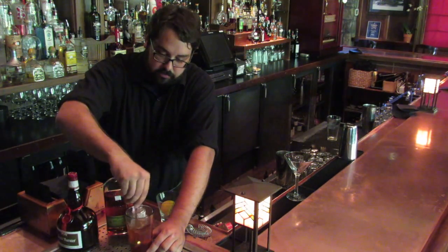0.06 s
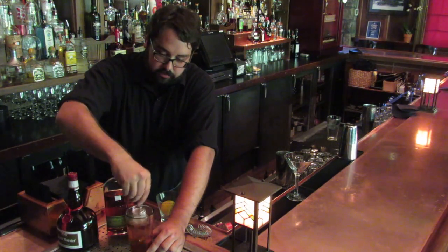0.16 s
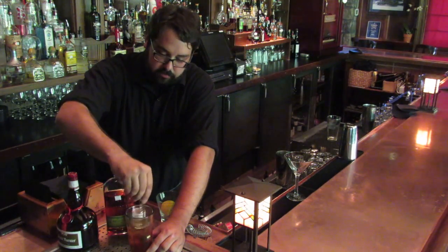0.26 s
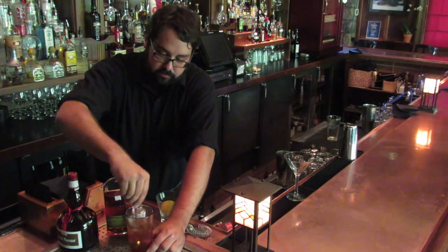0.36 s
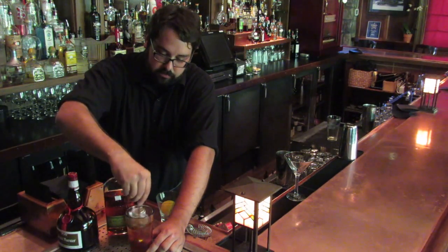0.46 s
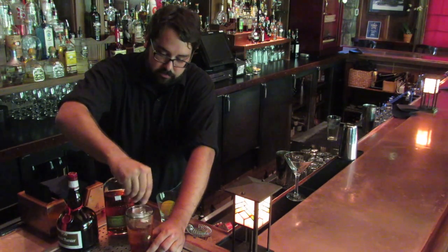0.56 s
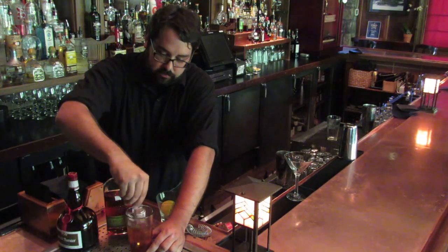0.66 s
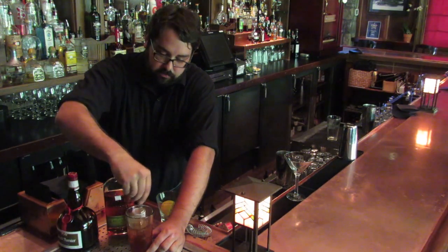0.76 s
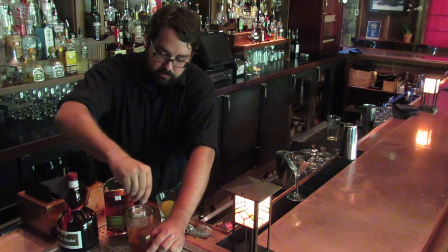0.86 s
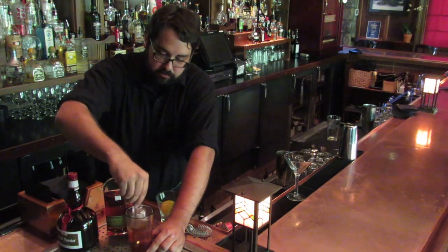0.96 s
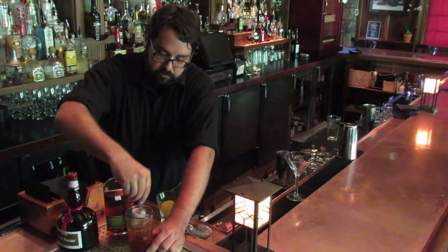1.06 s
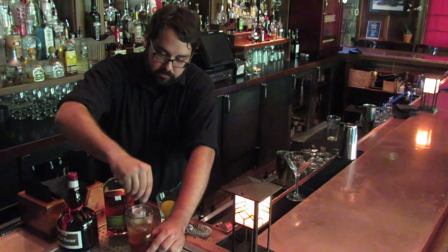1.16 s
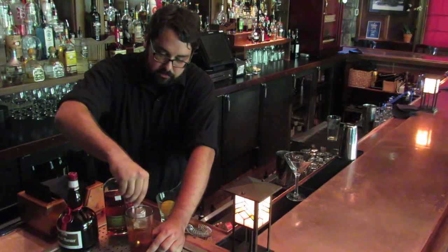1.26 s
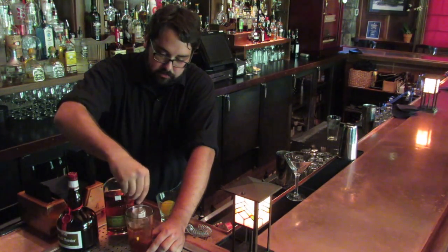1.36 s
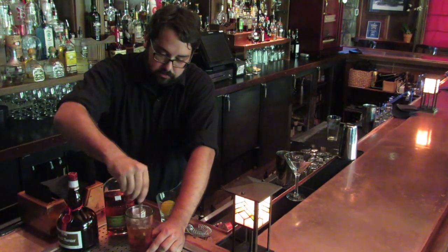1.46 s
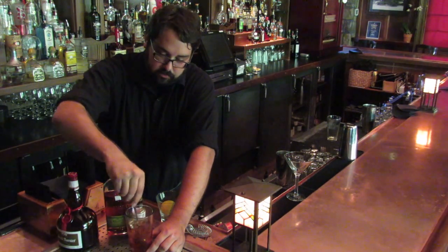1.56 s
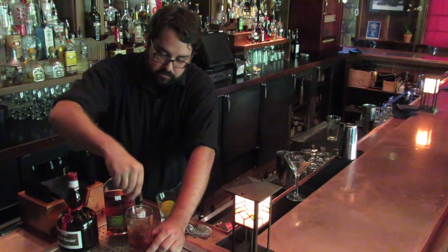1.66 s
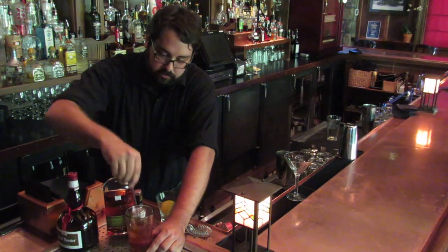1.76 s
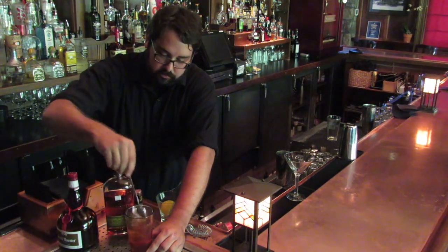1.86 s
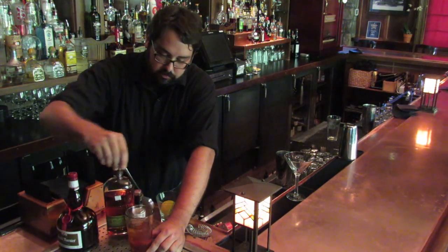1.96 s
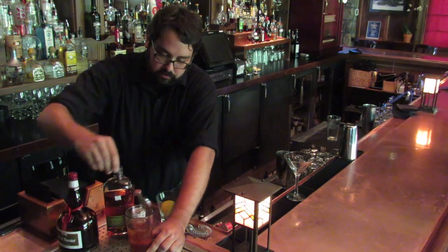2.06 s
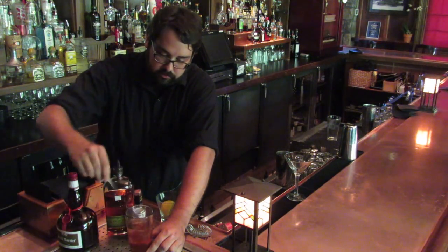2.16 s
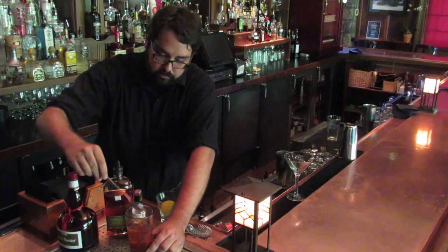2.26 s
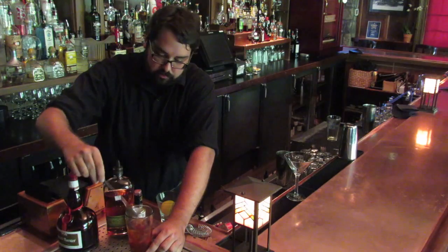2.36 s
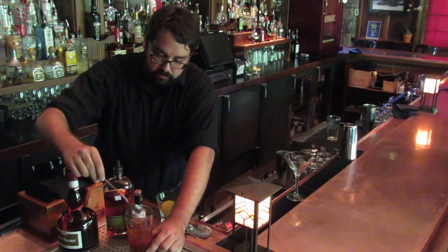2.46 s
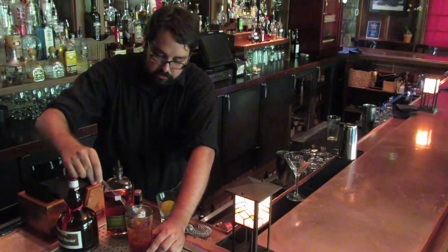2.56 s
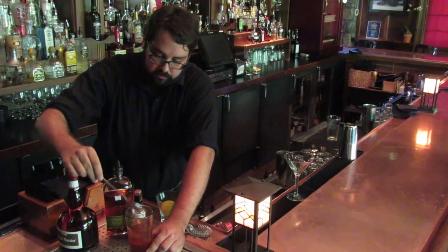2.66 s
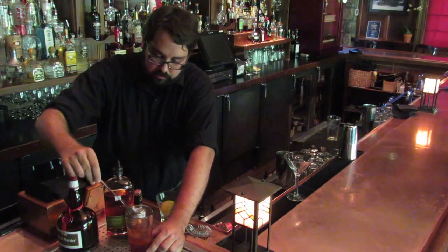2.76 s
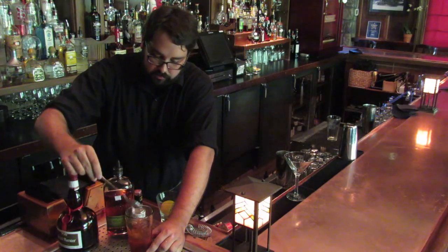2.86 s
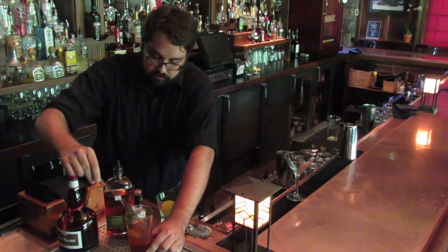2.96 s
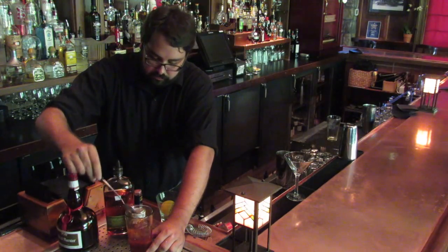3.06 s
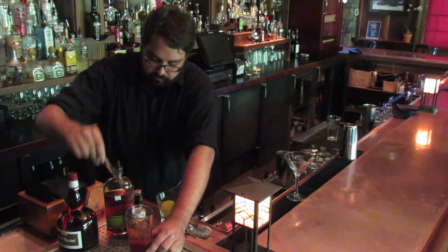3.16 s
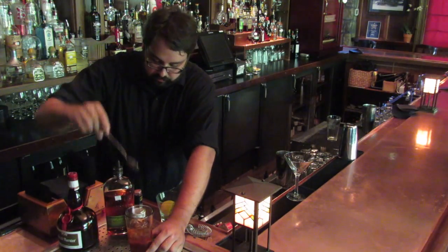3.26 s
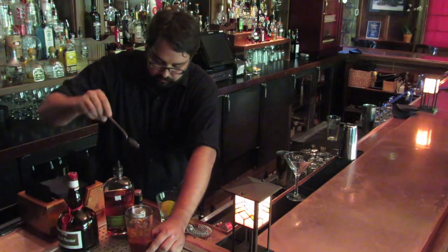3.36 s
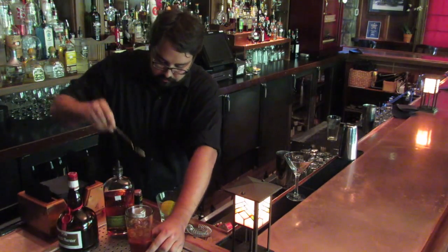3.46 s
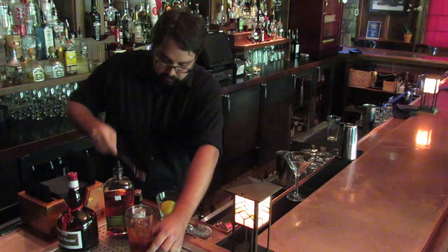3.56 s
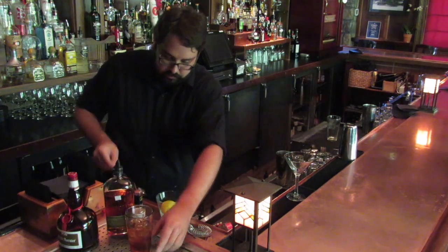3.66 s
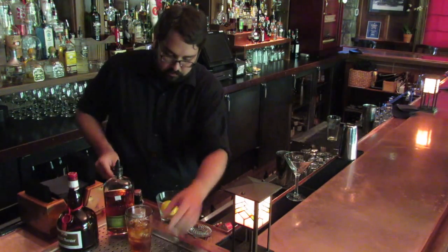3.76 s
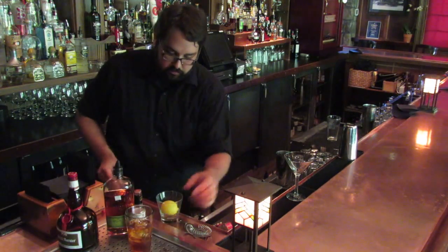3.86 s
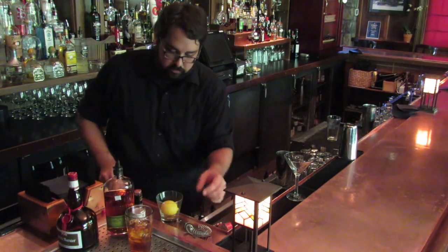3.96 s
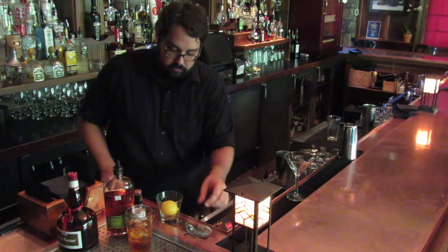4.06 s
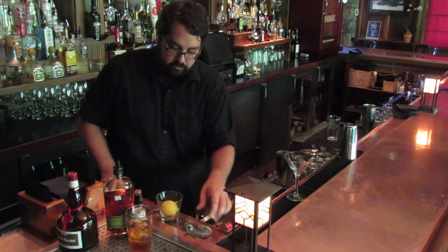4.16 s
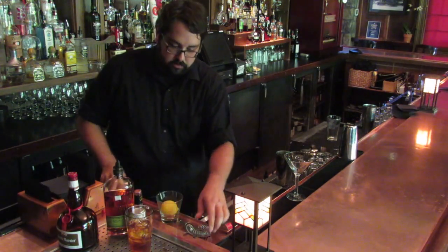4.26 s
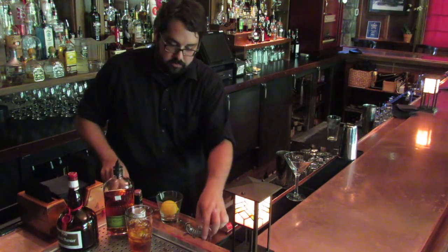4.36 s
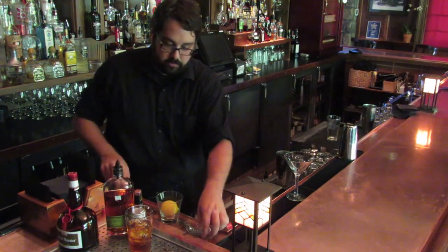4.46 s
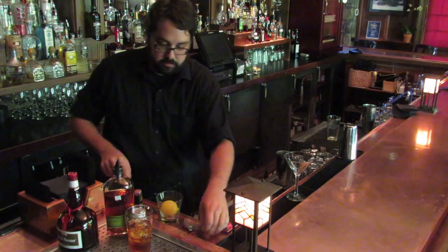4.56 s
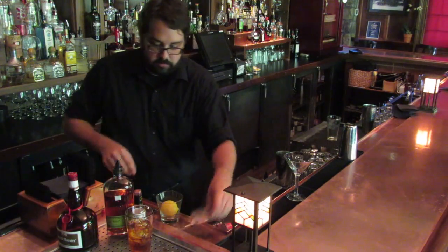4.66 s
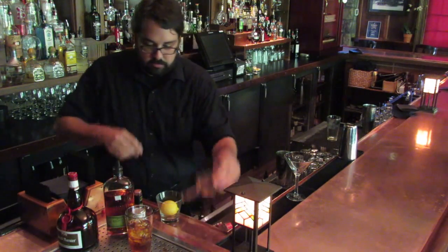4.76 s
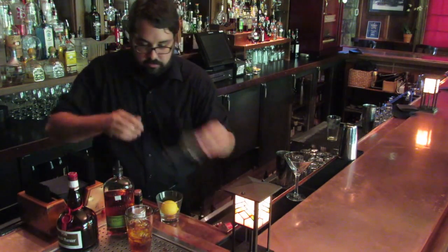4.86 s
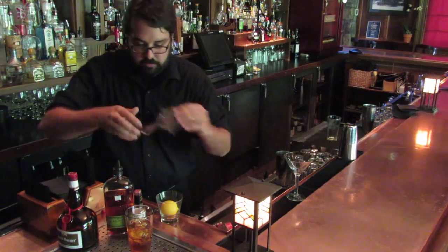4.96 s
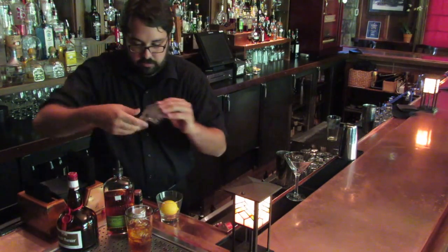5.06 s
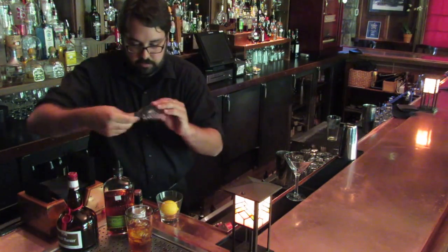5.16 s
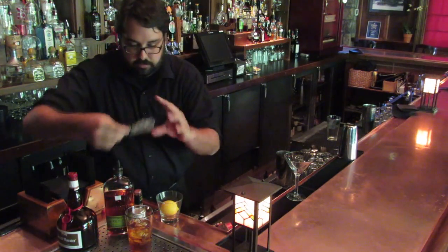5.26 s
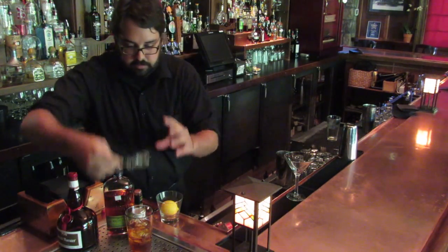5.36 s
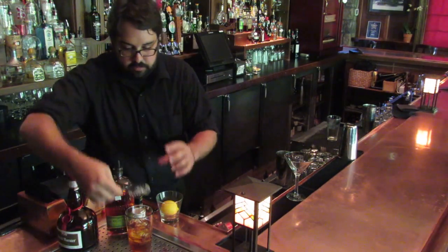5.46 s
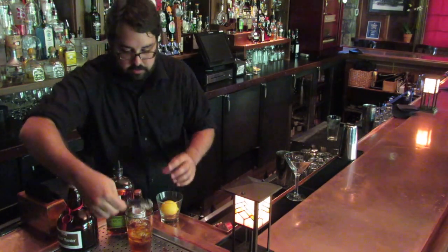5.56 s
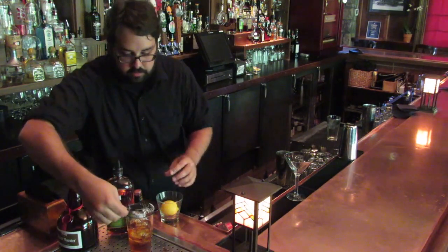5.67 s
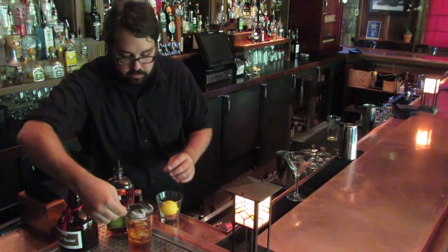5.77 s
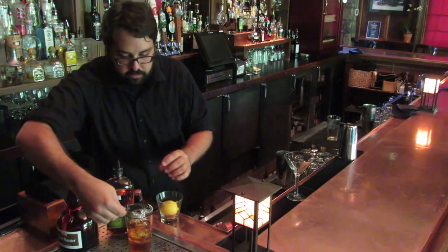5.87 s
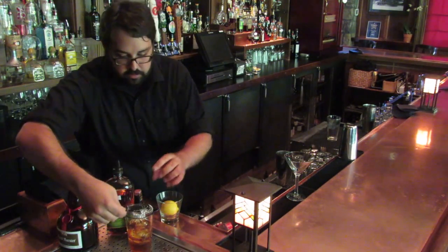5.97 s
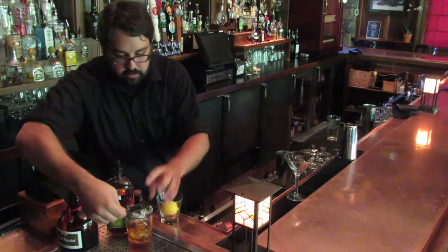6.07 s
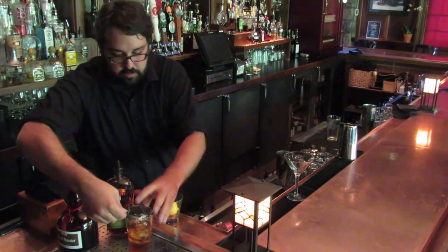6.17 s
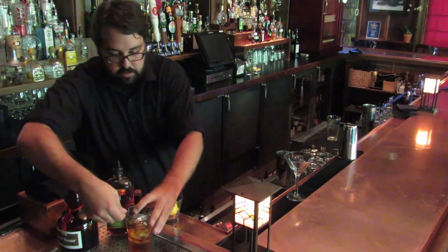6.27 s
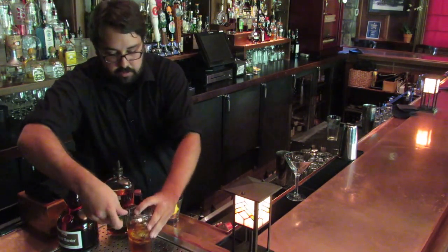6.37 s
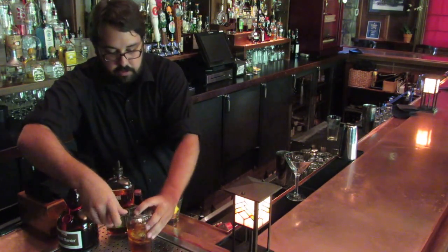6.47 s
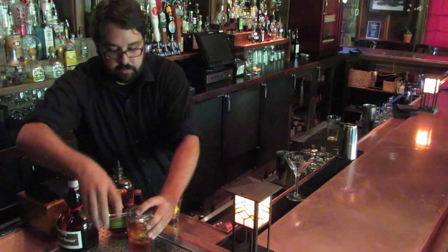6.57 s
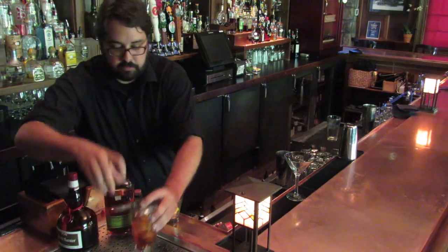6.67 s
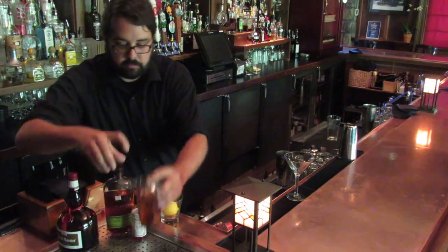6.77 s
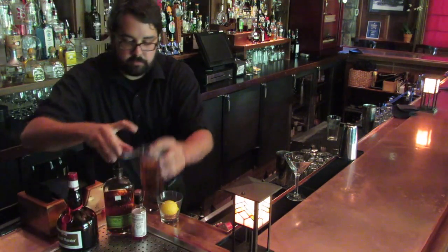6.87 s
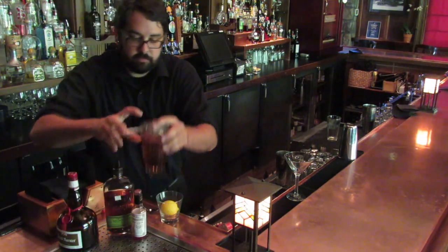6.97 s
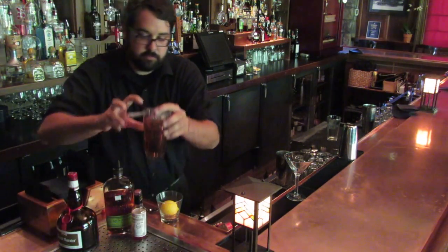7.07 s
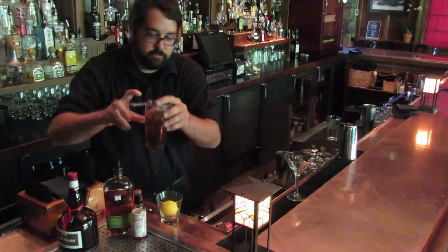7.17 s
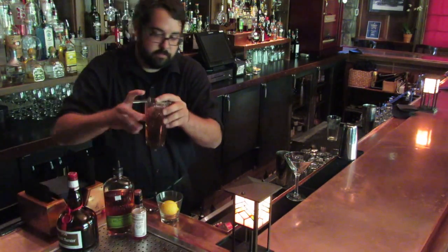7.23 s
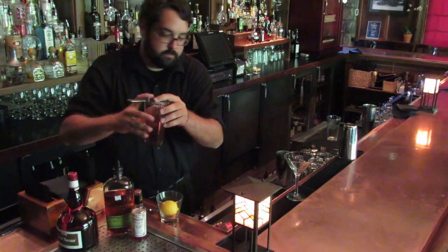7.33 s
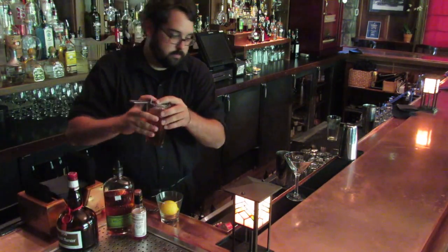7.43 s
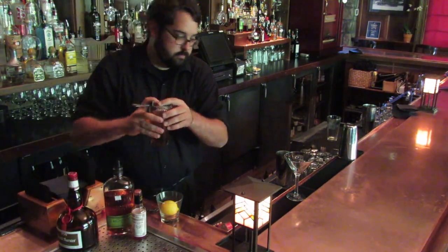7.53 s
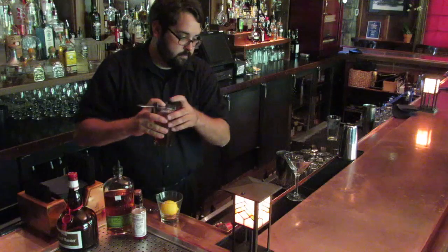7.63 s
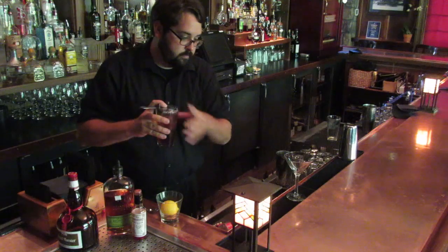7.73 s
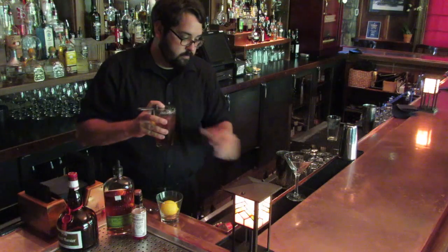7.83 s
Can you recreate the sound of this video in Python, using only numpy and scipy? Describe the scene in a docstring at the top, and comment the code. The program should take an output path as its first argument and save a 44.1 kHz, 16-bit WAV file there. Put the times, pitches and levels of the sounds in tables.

```python
"""Refrigerators hum in a bar room throughout, as steady tones over a rush of air.
At first a bar spoon stirs ice in a mixing glass: colliding cubes grind, scrape and set the damped glass singing.
The spoon then ticks five times on the rim, and the freer glass rings; the spoon is laid down with a short clank.
A spring strainer is picked up with a rattle and seated on the glass, and the glass is lifted, brushing glassware.
The camera's gain control ducks under loud sound such as the taps, then creeps back up."""
import sys
import numpy as np
from scipy import signal
from scipy.fft import rfft, irfft, next_fast_len
from scipy.io import wavfile
from scipy.ndimage import minimum_filter1d

SR = 44100
rng = np.random.default_rng(int(sys.argv[2]) if len(sys.argv) > 2 else 0)


def put_to_file(sound):
    """Save the sound as 16-bit audio at rate SR, in the file named by the first command-line argument."""
    columns = np.atleast_2d(sound).T  # one column per channel
    safe = np.clip(columns, -1, 1)
    whole_steps = np.round(safe * 32767)
    wavfile.write(sys.argv[1], SR, whole_steps.astype(np.int16))


N = 348390
TIME = np.arange(N) / SR
CUTOFF_HZ = 15900   # top of the recorded band


def from_db(db):
    """Decibels to gain."""
    return 10 ** (np.asarray(db) / 20)


def in_time(rows):
    """Draw a curve through (time, value) rows, at every sample."""
    return np.interp(TIME, *np.transpose(rows))


def at_hz(points, hz):
    """Read a spectrum on a log-frequency axis."""
    known, values = np.transpose(points)
    return np.interp(np.log(hz + 1), np.log(known), values)


def rms_one(x):
    """Scale to unit power."""
    return x / np.sqrt(np.mean(x ** 2) + 1e-20)


def smooth(x, seconds):
    """One-pole lag."""
    r = np.exp(-1 / (seconds * SR))
    return signal.lfilter([1 - r], [1, -r], x)


def colour(x, points, tilt_db=0):
    """Shape noise by a spectrum, tilted in dB per octave above 1 kHz."""
    hz = np.fft.rfftfreq(x.shape[-1], 1 / SR)
    octaves = np.log2(np.maximum(hz / 1000, 1))
    gain = from_db(at_hz(points, hz) + tilt_db * octaves)
    return irfft(rfft(x) * gain, x.shape[-1])


def drift(rate):
    """Slow random wander of spread one, with its cutoff at rate Hz."""
    knots = rng.standard_normal(int(N / SR * 100))   # 100 per second
    lowpass = signal.butter(2, min(rate, 45), fs=100, output="sos")
    slow = signal.sosfiltfilt(lowpass, knots, padtype="even")
    return np.interp(TIME, np.linspace(0, N / SR, len(slow)), rms_one(slow))


def add(track, s, sound):
    """Mix a sound in at time s."""
    part = track[int(s * SR):][:len(sound)]
    part += sound[:len(part)]


def crack(spectrum, ms, tilt_db=0, sliding_ms=20):
    """The brief, crowded ringing of a hard contact; a long one is a slide and swells in."""
    t = TIME[:SR // 8]
    swell = 1 - np.exp(-4000 * t / ms) if ms > sliding_ms else 1
    decay = np.exp(-1000 * t / max(ms, .5))
    return rms_one(colour(rng.standard_normal(len(t)), spectrum, tilt_db)) * swell * decay


def ring(hz, t60, db):
    """Modes set ringing by one blow, each dying exponentially."""
    t = TIME[:SR * 3 // 4, None]
    return np.sum(from_db(db - 60 * t / t60) * np.sin(2 * np.pi * hz * t), axis=1)


def resonate(x, hz, cycles):
    """A resonance that dies by 60 dB in so many cycles and keeps the power of what drives it."""
    r, w = from_db(-60 * hz / (cycles * SR)), 2 * np.pi * hz / SR
    zeros = np.sqrt((1 - r * r) / 2) * np.array([1, 0, -1])
    return signal.lfilter(zeros, [1, -2 * r * np.cos(w), r * r], x + 1e-18)


def grains(per_s, spread_db):
    """Random tiny collisions of uneven size."""
    when, size, sign = rng.random((3, N))
    at, out = when < per_s / SR, np.zeros(N)
    strength_db = spread_db * np.minimum(-np.log(1 - size[at]), 3.5)
    out[at] = from_db(strength_db) * np.sign(sign[at] - .5)
    return rms_one(out)


def contacts(table, modes, spectrum, scatter_db=3.5):
    """Each contact cracks and rings the body; its brightness tilts both crack and ring."""
    out, (hz, t60, mode_db) = np.zeros(N), np.transpose(modes)
    for s, crack_db, ms, tilt_db, ring_db in table:
        strengths = mode_db + tilt_db * np.log2(hz / 4000) + scatter_db * rng.standard_normal(len(hz))
        add(out, s, from_db(crack_db) * crack(spectrum, ms, tilt_db))
        add(out, s, ring(hz, t60, ring_db + strengths))
    return out


# stereo spread of diffuse sound: (f/Hz, side minus mid level/dB)
SIDE_WIDTH = [(30, 2), (100, -18), (400, -14.5), (1000, -16.5), (2500, -20), (4500, -15), (8000, -7.5),
              (12000, -2)]


def diffuse(size):
    """Stereo noise from all sides: the two capsules differ most at the bottom and top of the band."""
    mid, side = rng.standard_normal((2, size))
    width = from_db(at_hz(SIDE_WIDTH, np.fft.rfftfreq(size, 1 / SR)))
    return irfft((rfft(mid) + width * rfft(side) * [[1], [-1]]) / np.hypot(1, width), size)


# compressor and fan tones before they waver: (f/Hz, rms level/dB)
HUM_TONES = [(58.5, -48), (81, -43.5), (120, -27), (162, -36.5), (212.5, -45.5), (241, -41), (293.8, -37.5),
             (362.5, -42.5), (410.8, -41.5), (449, -46.5), (516, -50)]
# rush of air in the room: (f/Hz, level/dB per Hz)
AIR_RUSH = [(25, -67.5), (50, -82), (90, -62), (140, -56.5), (200, -50), (280, -55), (400, -59.5),
            (550, -65.5), (800, -69), (1100, -72), (2000, -81.5), (4000, -93), (10000, -98.5),
            (15500, -107)]
# how much faster the second compressor runs than the loudest tone: (t/s, f/Hz faster)
COMPRESSOR_BEAT = [(0, 1.35), (2.8, 1.45), (3.8, 0.8)]
BEAT_DB, FIRST_SWELL_S = -11.5, 0.26   # its level against the loudest tone; when the two first add up


def refrigerators(waver_db=3.5, wander_hz=0.34):
    """Tones waver over the rush of air; a second compressor beats slowly against the loudest tone."""
    hum, strongest = 0, max(db for hz, db in HUM_TONES)
    beats = np.cumsum(in_time(COMPRESSOR_BEAT)) / SR
    ahead = 2 * np.pi * (beats - np.interp(FIRST_SWELL_S, TIME, beats))
    for hz, db in HUM_TONES:
        phase = 2 * np.pi * (np.cumsum(hz + wander_hz * drift(1.66)) / SR + rng.random())
        if db == strongest:
            tone = np.sin(phase) + from_db(BEAT_DB) * np.sin(phase + ahead)
        else:
            tone = from_db(waver_db * drift(2.8)) * np.sin(phase)
        hum = hum + np.sqrt(2) * from_db(db) * tone
    air = colour(diffuse(next_fast_len(N)), AIR_RUSH)[:, :N]
    return hum + np.sqrt(SR / 2) * air


# how long the room rings: (f/Hz, 60 dB decay t/s)
ROOM_DECAY = [(300, 0.36), (2000, 0.59), (5000, 0.45), (9000, 0.45), (15000, 0.41)]


def room(x, build_s=0.001):
    """Dense echoes from counter, shelves and walls; each band of noise dies at its own pace."""
    size = SR * 3 // 4
    t, hz, noise, tail = TIME[:size], np.fft.rfftfreq(size, 1 / SR), rfft(diffuse(size)), 0
    edges = [0, 1000, 3000, 6000, 9000, 12000, SR]   # band edges, Hz
    for low, high in zip(edges, edges[1:]):
        t60 = at_hz(ROOM_DECAY, min((low + high) / 2, CUTOFF_HZ))
        band = irfft(noise * (hz >= low) * (hz < high), size)
        tail = tail + band * from_db(-60 * t / t60)
    tail = rms_one(tail * (1 - np.exp(-t / build_s))) / np.sqrt(size)
    return signal.fftconvolve(x[None], tail, axes=1)[:, :N]


def near_bottles(x, scatter_db=-6, above_hz=5000, fade_s=0.0022):
    """Bottles around the glass scatter its treble, differently to each capsule."""
    t = TIME[:SR // 30]
    paths = rms_one(rng.standard_normal((2, len(t))) * np.exp(-t / fade_s)) / np.sqrt(len(t))
    treble = signal.sosfilt(signal.butter(2, above_hz, "high", fs=SR, output="sos"), x)
    return from_db(scatter_db) * signal.fftconvolve(treble[None], paths, axes=1)[:, :N]


# ringing modes of neighbouring glassware: (f/Hz, 60 dB decay t/s, relative level/dB)
BOTTLE_MODES = [(4440, 0.029, -7), (4460, 0.025, -7), (4920, 0.018, -2), (5400, 0.011, -9.5),
                (7020, 0.06, -15), (6900, 0.019, -5.5), (10740, 0.075, -12.5), (11500, 0.07, -20),
                (14940, .04, -21)]
# light touches: (t/s, crack level/dB, crack decay/ms, brightness/dB per octave, ring level/dB)
GLASSWARE_TOUCHES = [(4.619, -25, 4, 3, -26.5), (6.944, -30, 4.6, -1.5, -31)]
# colour of a scratch on glass, for these touches and the strainer: (f/Hz, level/dB)
SCRATCH_COLOUR = [(400, 8.5), (1000, 4.5), (1900, 5), (3200, -7.5), (4600, -6), (5800, -10.5), (7000, -6),
                  (7700, 0), (8600, -9), (11700, -10), (13000, -14), (15500, -19.5)]


def glassware():
    """Neighbouring glassware is brushed as strainer and glass are lifted: a scratch and a short clink."""
    return contacts(GLASSWARE_TOUCHES, BOTTLE_MODES, SCRATCH_COLOUR)


# ringing modes of the strainer: (f/Hz, 60 dB decay t/s, relative level/dB)
STRAINER_MODES = [(2050, 0.037, -2), (2366, 0.017, 9), (2900, 0.0091, 8), (6540, 0.15, -3.5),
                  (7424, 0.24, -14), (10300, 0.29, -20), (11250, 0.36, -21), (13380, 0.2, -14)]
# picking it up: (t/s, crack level/dB, crack decay/ms, brightness/dB per octave, ring level/dB)
STRAINER_PICKUP = [(4.324, -23, 4.4, 3, -32.5), (4.331, -32, 12, -2, -31.5), (4.396, -24.5, 9.5, -4.5, -59),
                   (4.457, -34, 11, 0, -37), (4.500, -29.5, 9.4, -1.5, -57), (4.567, -23, 3.4, 0.5, -44)]
# seating it: (t/s, crack level/dB, crack decay/ms, brightness/dB per octave, ring level/dB)
STRAINER_SEATING = [(5.691, -34, 6, 4.5, -44.5), (5.724, -34, 5.9, 8, -43), (5.946, -44.5, 22, 2.5, -55),
                    (5.989, -43, 7.2, 2, -54), (6.140, -32.5, 38, 4.5, -48), (6.200, -22.5, 12.3, -3, -60),
                    (6.384, -39, 8, 0.5, -54), (6.410, -27, 10.4, 2, -53), (7.587, -45, 6.8, 0.5, -55)]
# coil rattling over the counter: (t/s, level/dB)
COIL_DRAG = [(4.32, -100), (4.34, -35), (4.47, -33.5), (4.56, -36), (4.68, -41), (4.78, -100)]
# colour of a hard contact, for strainer and spoon: (f/Hz, level/dB)
HARD_CONTACT = [(200, -24), (600, 8), (1100, -0.5), (2400, -1.5), (3600, -5.5), (6000, -8), (10000, -8),
                (15500, -21)]


def strainer(held_damping=0.29):
    """The strainer rings as it is picked up, its coil drags as a rattle, then it scratches the held glass."""
    held_glass = [(hz, t60 * held_damping, inside_db) for hz, t60, rim_db, inside_db in GLASS_MODES]
    coil = from_db(in_time(COIL_DRAG)) * colour(grains(per_s=600, spread_db=3.5), HARD_CONTACT)
    pickup = contacts(STRAINER_PICKUP, STRAINER_MODES, HARD_CONTACT)
    return pickup + coil + contacts(STRAINER_SEATING, held_glass, SCRATCH_COLOUR)


# ringing modes of the spoon: (f/Hz, 60 dB decay t/s, relative level/dB)
SPOON_MODES = [(1098, 0.094, -2), (1670, 0.061, 2.5), (2280, 0.079, -2), (3680, 0.11, -10),
               (4370, 0.063, -6), (7340, 0.22, -9), (10700, 0.13, -16), (13220, .1, -12)]
# laying it down: (t/s, crack level/dB, crack decay/ms, brightness/dB per octave, ring level/dB)
SPOON_LANDING = [(3.917, -18, 3.8, -0.48, -29)]


def spoon_laid_down():
    """The spoon lands with a crack and its steel rings briefly."""
    return contacts(SPOON_LANDING, SPOON_MODES, HARD_CONTACT)


# mixing glass, undamped, some overtones in close pairs that beat; also played by stirring and strainer:
# (f/Hz, 60 dB decay t/s, relative level/dB struck on the rim, relative level/dB struck inside)
GLASS_MODES = [(1898, 0.68, -3.5, -1), (2960, 0.122, -38, -29.5), (4410, 0.45, -32.5, -2),
               (4430, 0.15, -19, -11), (4805, 0.21, -23, -2.5), (4890, 0.19, -31.5, -5.5),
               (5480, 0.15, -39, -18.5), (6738, 0.11, -32.5, -8.5), (7610, 0.12, -20, -13),
               (7810, 0.074, -18, -27), (7675, 0.4, -25, -7), (11730, 0.15, -38.5, -42),
               (13280, 0.12, -43, -43)]
# spoon on the rim; the last level, for the pair in SPOT_PAIR_HZ, is set by the spot that is hit:
# (t/s, ring level/dB, extra overtone level/dB, lowest mode's decay share, tick level/dB, extra pair level/dB)
RIM_TAPS = [(2.2547, 1.36, -0.5, 0.9, -6, -5), (2.4480, 1.9, 1, 0.68, -5.5, 4),
            (2.6525, 3.1, 1, 0.5, -4, 3.5), (2.844, 4.77, -1.5, 0.54, -2.5, 3),
            (3.051, 2.6, 2.5, 0.22, -5.5, 7.5)]
# colour of the spoon's tick: (f/Hz, level/dB)
TICK_COLOUR = [(500, -37), (1200, -10), (1700, -19), (2000, 14), (2400, -10), (3000, -5.5), (3700, -26),
               (4600, -7.5), (5700, -21), (7100, -11), (7800, 11), (8400, -18), (12500, -14.5),
               (15500, -33)]
SPOT_PAIR_HZ = (4300, 4500)


def rim_taps(tick_ms=2.4, radiate_hz=1550):
    """The spoon ticks on the rim and the glass rings; where the spoon lingers the lowest mode dies early."""
    ticks, note, overtones = np.zeros((3, N))
    hz, t60, rim_db, _ = np.transpose(GLASS_MODES)
    pair = (hz > SPOT_PAIR_HZ[0]) & (hz < SPOT_PAIR_HZ[1])
    for s, ring_db, overtone_db, length, tick_db, spot_db in RIM_TAPS:
        scatter = 1.1 * rng.standard_normal(len(hz))
        strengths = ring_db + overtone_db + rim_db + spot_db * pair + scatter
        add(note, s, ring(hz[:1], t60[:1] * length, ring_db + rim_db[:1]))
        add(overtones, s, ring(hz[1:], t60[1:], strengths[1:]))
        add(ticks, s, from_db(tick_db) * crack(TICK_COLOUR, tick_ms))
    # a small glass radiates little bass
    small_body = signal.butter(6, radiate_hz, "high", fs=SR, output="sos")
    return signal.sosfilt(small_body, note), ticks + signal.sosfilt(small_body, overtones)


# colour of grinding ice, also of its knocks: (f/Hz, level/dB)
ICE_COLOUR = [(400, 6.5), (900, -0.5), (1400, 1.5), (2400, -1.5), (3000, 5.5), (3800, -5), (4600, 11),
              (5700, -9.5), (7000, 1), (8500, -4), (12000, -8.5), (15500, -16.5)]


def cubes(cycles=60, patchy_db=4.0, count=30):
    """Cubes click at pitches of their own, in spells as they tumble past the spoon; small chips click most."""
    out = 0
    for hz in np.geomspace(900, 14000, count) * rng.uniform(.96, 1.04, count):
        clicks = grains(per_s=60 + hz / 50, spread_db=3.8)
        level = from_db(at_hz(ICE_COLOUR, hz) + patchy_db * drift(10.0))
        out = out + resonate(clicks, hz, cycles) * np.sqrt(hz) * level
    return rms_one(out)


# a cube scraping along the wall: (middle t/s, half-length t/s, f/Hz, level/dB)
WALL_SCRAPES = [(0.02, 0.066, 1385, -37.5), (0.293, 0.028, 2940, -39), (0.616, 0.0096, 3060, -27),
                (0.846, 0.097, 3600, -39.5), (0.887, 0.024, 3100, -29), (1.126, 0.11, 1360, -36.5),
                (1.43, 0.019, 2900, -40), (1.723, 0.011, 4600, -25.5), (1.751, 0.021, 2930, -34.5)]


def scrapes(cycles=28):
    """A sliding cube slips in quick jerks that ring one of its resonances."""
    slips, out = grains(per_s=1000, spread_db=3), 0
    for s, length, hz, db in WALL_SCRAPES:
        slide = slips * np.exp(-((TIME - s) / length) ** 2)
        out = out + from_db(db) * resonate(slide, hz, cycles)
    return out


# the spoon drives the ice round, about three and a half times a second: (t/s of the peak, vigour level/dB)
SPOON_PUSHES = [(0.02, -30), (0.31, -27.5), (0.55, -28.5), (0.88, -23), (1.18, -27.5), (1.522, -28),
                (1.75, -29)]
PUSH_RISE_DB_PER_S, PUSH_FALL_DB_PER_S = 58.5, 101
COAST_DB = -34   # the ice keeps circling between pushes
STIR_END_S, SETTLE_DB_PER_S = 1.82, 89


def stir_vigour():
    """Each push builds up and falls away; the ice coasts in between and settles when the spoon stops."""
    level_db = COAST_DB - SETTLE_DB_PER_S * np.maximum(TIME - STIR_END_S, 0)
    for s, db in SPOON_PUSHES:
        drop_db = np.maximum(PUSH_RISE_DB_PER_S * (s - TIME), PUSH_FALL_DB_PER_S * (TIME - s))
        level_db = np.maximum(level_db, db - drop_db)
    return from_db(level_db)


# single ice knocks: (t/s, crack level/dB, crack decay/ms, brightness/dB per octave, ring level/dB)
KNOCKS = [(.077, -21, 4, -2.5, -31.5), (.364, -38, 1.8, 7.5, -24.5), (.449, -27, 4, 1, -32),
          (.509, -23, 4.5, -4, -27), (.556, -21, 2.9, -2.5, -28), (.611, -25, 6.1, 2, -24),
          (.751, -25, 6.4, 2.5, -29), (1.036, -32, 2.6, 4, -22.5), (1.128, -28.5, 6, 10, -39),
          (1.168, -25.5, 12, 7, -39), (1.408, -21, 4.4, -1, -40), (1.527, -20.5, 7.3, 0.5, -29),
          (1.711, -28, 6, 0, -25.5), (1.746, -31, 3.8, 2, -24)]
# lowest mode of the glass as the drink swirls up its wall, before the wobble: (t/s, f/Hz)
SWIRL_PITCH = [(0.15, 1886), (0.3, 1898), (0.6, 1908), (0.9, 1913), (1.1, 1875), (1.4, 1866), (1.55, 1913),
               (1.9, 1898)]
SLOSH_HZ, SLOSH_PER_S = 22, 7.7   # spread of the quick pitch wobble, and the cutoff of its rate in Hz


def stirring(grind_db=-5, sing_db=-8, damping=0.23):
    """Cubes grind and knock the wall; hand and ice damp the glass, and the swirl bends its pitch."""
    vigour = stir_vigour()
    lowest_hz = in_time(SWIRL_PITCH) + SLOSH_HZ * drift(SLOSH_PER_S)
    turns = np.cumsum(lowest_hz / GLASS_MODES[0][0]) / SR   # shared bend of all modes
    hits = vigour * grains(per_s=530, spread_db=1.5)
    out = from_db(grind_db) * vigour * cubes() + scrapes()
    modes = [(hz, t60 * damping, inside_db) for hz, t60, rim_db, inside_db in GLASS_MODES]
    for hz, t60, db in modes:
        spin, r = np.exp(2j * np.pi * hz * turns), from_db(-60 / (t60 * SR))
        push = hits * rng.standard_normal(N)   # every collision meets the wall at another spot
        # decay in a frame that turns with the mode, so that its pitch can bend
        swing = signal.lfilter([np.sqrt(2 * (1 - r * r))], [1, -r], push / spin + 1e-18)
        out += from_db(sing_db + db) * (spin * swing).imag
    return out + contacts(KNOCKS, modes, ICE_COLOUR)


def scene():
    """All is played on the counter, a step from the camera; the glass's lowest note arrives mostly direct."""
    note, ticks = rim_taps()
    stir = stirring()
    tools = spoon_laid_down() + strainer() + glassware()
    note_send = from_db(-12) * note
    echoes = room(from_db(-4) * stir + from_db(1.4) * tools + from_db(-1) * ticks + note_send)
    direct = from_db(-2.0) * stir + tools + from_db(-0.76) * ticks
    return direct + note + echoes + refrigerators() + near_bottles(direct)


def gain_control(x, limit_db=-11.5, hold_s=0.63, release_db_per_s=4.5):
    """Loud sound pulls the gain down a moment late, so attacks overshoot; it waits, then creeps back."""
    power = smooth(x[0] ** 2, 0.0029)   # the left channel steers both
    over = np.maximum(10 * np.log10(power + 1e-12) - limit_db, 0)
    size = int(hold_s * SR) // 2 * 2 + 1
    held = -minimum_filter1d(-over, size, origin=size // 2, mode="nearest")
    creep = release_db_per_s * TIME
    released = np.maximum.accumulate(held + creep) - creep
    late = np.interp(TIME - .002, TIME, smooth(released, .0006))
    return x * from_db(-late)


# level balance of the microphone pair: (f/Hz, left minus right level/dB)
LEFT_LEAN = [(30, 8), (100, 9.8), (350, 10.3), (650, 5.4), (1100, 2.96), (2500, 1.6), (5000, 1.9),
             (8000, 2.4), (12000, 1.8)]
# phase of the microphone pair: (f/Hz, left's lead/rad)
LEFT_LEAD = [(40, -1.1), (250, -0.83), (700, -0.92), (1200, -0.68), (2000, -0.2), (6000, 0.39),
             (12000, 0.99)]


def record(dry):
    """Unequal capsules, a narrow dip in the low mids, gain control, clipping and the top cut."""
    size = next_fast_len(N + SR // 8)
    hz = np.fft.rfftfreq(size, 1 / SR)
    balance = from_db(-at_hz(LEFT_LEAN, hz)) * np.exp(-1j * at_hz(LEFT_LEAD, hz))
    right = irfft(rfft(dry[1], size) * balance, size)[:N]
    x = np.array([dry[0], right])
    dip_hz, dip_q, dip_share = 690, 3.2, .82
    notched = signal.lfilter(*signal.iirnotch(dip_hz, dip_q, SR), x)
    x = x + dip_share * (notched - x)
    x = np.clip(gain_control(x), -1, 1)
    return signal.sosfilt(signal.ellip(10, .1, 80, CUTOFF_HZ, fs=SR, output="sos"), x)


dry = scene()
out = record(dry)
put_to_file(out)
```